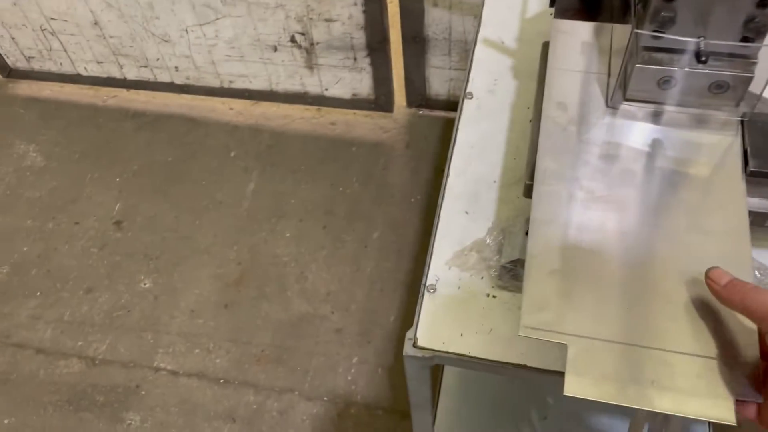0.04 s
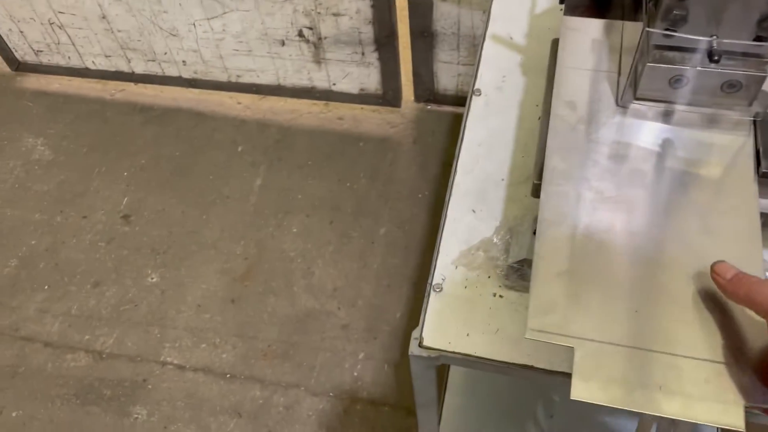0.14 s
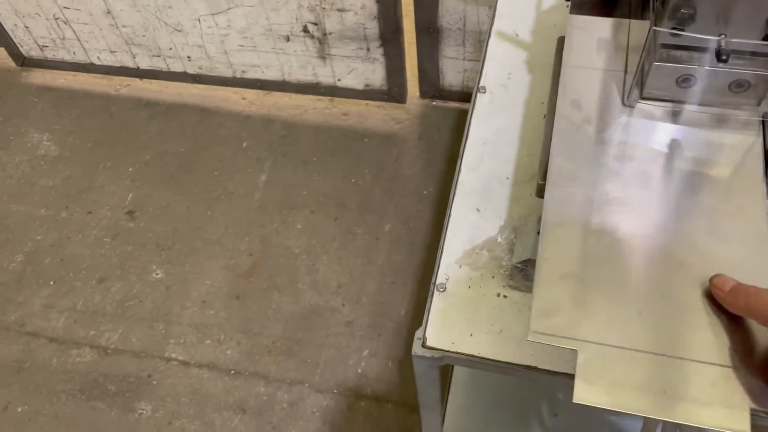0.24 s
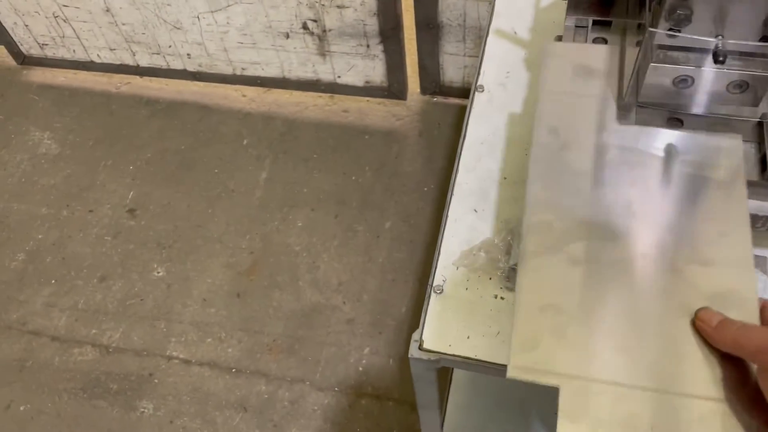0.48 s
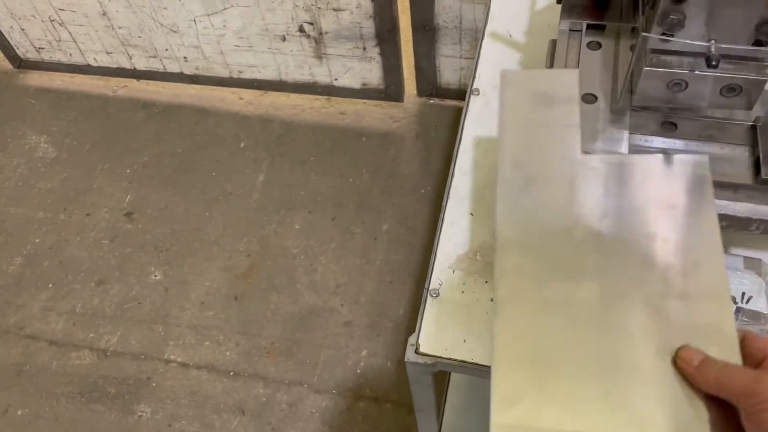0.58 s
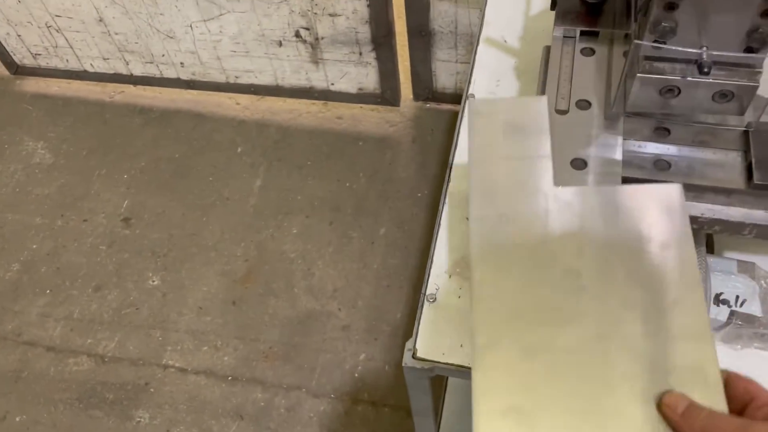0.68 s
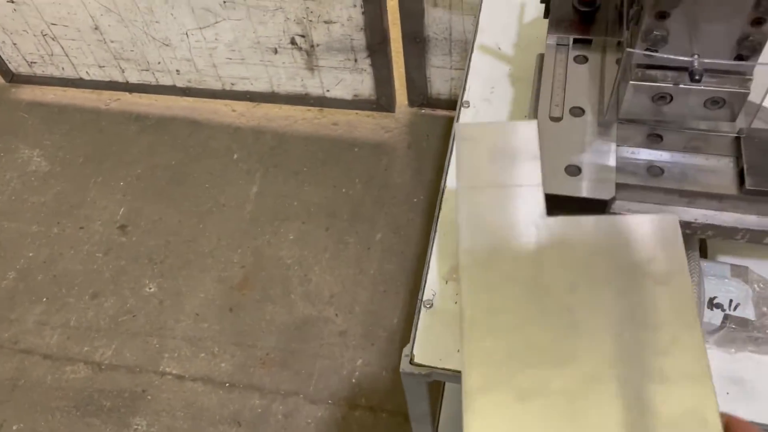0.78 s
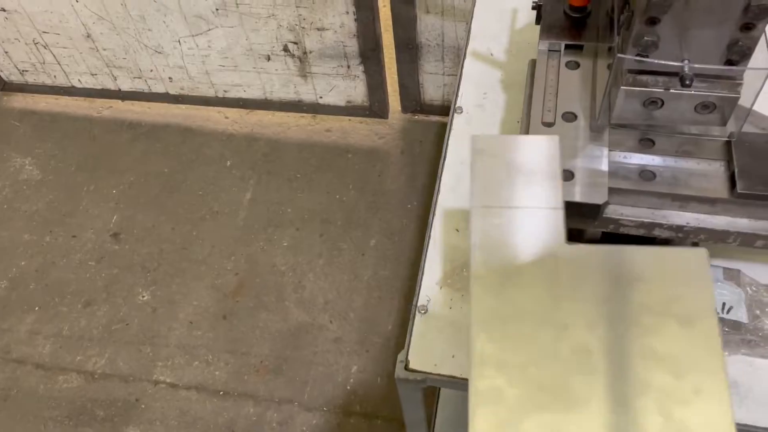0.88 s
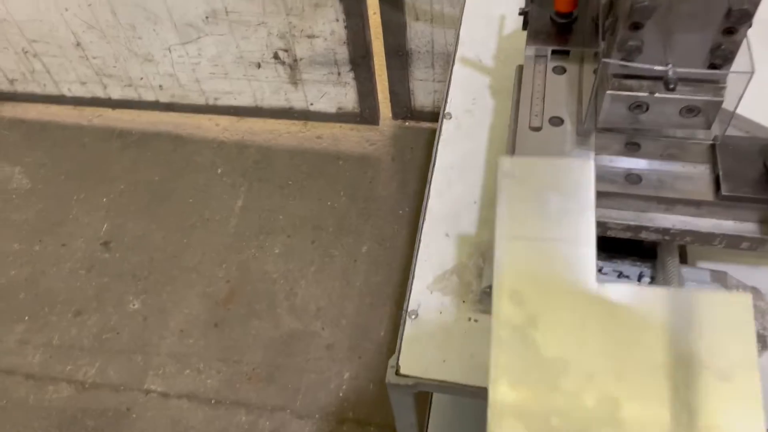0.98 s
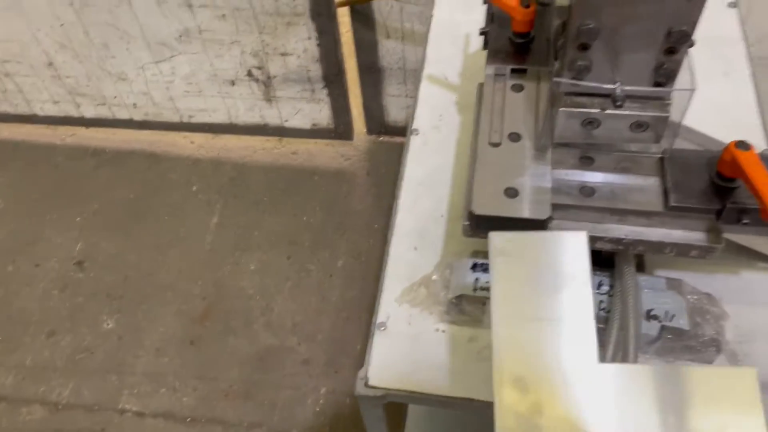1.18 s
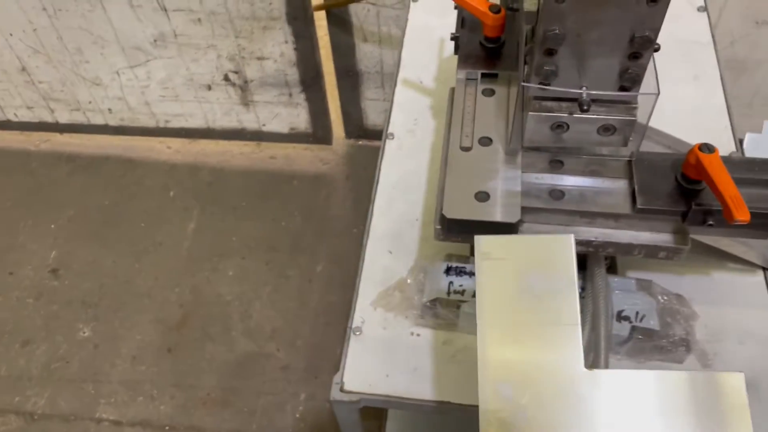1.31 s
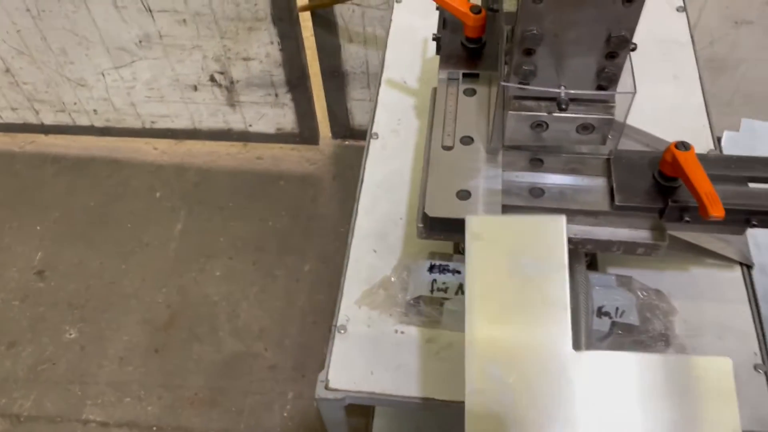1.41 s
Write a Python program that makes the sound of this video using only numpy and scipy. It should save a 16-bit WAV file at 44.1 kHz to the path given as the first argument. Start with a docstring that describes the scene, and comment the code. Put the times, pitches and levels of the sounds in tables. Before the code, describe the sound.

A steel sheet clacks on a metal table and scrapes briefly out of a machine.

```python
"""Workshop: a steel sheet is drawn out of a pneumatic notching machine.
It shifts, clacks on the steel table, scrapes over the die in short jerks, rings as its edge slips
free and glides off. Impacts and friction slips drive the sheet's clear and dense modes.
Housing and room echo it; behind it a motor hums and the workshop rumbles."""
import sys
import numpy as np
from scipy import signal
from scipy.fft import rfft, irfft
from scipy.io import wavfile

SR = 44100
rng = np.random.default_rng(int(sys.argv[2]) if len(sys.argv) > 2 else 0)


def wav_out(sig):
    """Save sig, one row per channel (or a flat mono array), as 16-bit PCM at SR to the path in sys.argv[1]."""
    wavfile.write(sys.argv[1], SR, np.round(np.clip(np.atleast_2d(sig).T, -1, 1) * 32767).astype(np.int16))


N = 63945
TIME = np.arange(N) / SR
BIN_HZ = np.arange(N + 1) * SR / (2 * N)

# dense modes of the scraped sheet: f/Hz, relative density/dB
SCRAPE_SPECTRUM = [(150, -5), (450, 3), (850, -2.5), (1100, -9.5), (1600, -3.5), (2400, 0), (3600, -3),
                   (5300, -3), (6900, 3.5), (9000, 6), (10300, -4), (12500, -7.5), (16000, -4)]
# their decay: f/Hz, t60/s
SCRAPE_DECAY = [(400, 0.17), (3000, 0.013), (10000, 0.02)]


def from_db(db):
    return 10 ** (np.asarray(db) / 20)


def unit_rms(x):
    return x / np.sqrt(np.mean(x ** 2) + 1e-20)


def unit_energy(x):
    return unit_rms(x) / np.sqrt(N)


def at_hz(points, hz):
    """Table lookup on a log-frequency axis."""
    points_hz, values = np.transpose(points)
    return np.interp(np.log(np.maximum(hz, 1)), np.log(points_hz), values)


def gain_curve(points):
    return from_db(np.interp(TIME, *np.transpose(points)))


def click(t_s):
    return 1.0 * (np.arange(N) == int(t_s * SR))


def soften(x, cutoff_hz):
    """A softer contact passes less treble."""
    return signal.sosfilt(signal.butter(1, cutoff_hz, fs=SR, output="sos"), x + 1e-18)


def through(x, response):
    return signal.fftconvolve(x, response)[:N]


def noise_bands(size=N):
    """Yields (centre/Hz, noise) per third octave; neighbours are uncorrelated."""
    edges_hz = 20 * 2 ** (np.arange(30) / 3)
    white = rng.standard_normal((2, size + SR // 8))
    for k, (low, high) in enumerate(zip(edges_hz, edges_hz[1:])):
        bandpass = signal.butter(2, [low, high], "band", fs=SR, output="sos")
        yield np.sqrt(low * high), signal.sosfilt(bandpass, white[k % 2])[-size:]


def dense_ring(spectrum, decay, size=N // 6):
    """Impulse response of countless modes, each band dying at its own rate."""
    out = 0
    for hz, band in noise_bands(size):
        tail = band * from_db(-60 * TIME[:size] / at_hz(decay, hz))
        out += unit_rms(tail) * np.sqrt(hz) * from_db(at_hz(spectrum, hz))
    return unit_energy(np.pad(out, (0, N - size)))


def modal_ring(modes):
    """Impulse response of a few clear modes, alternating in sign."""
    return sum((-1) ** k * from_db(db - 60 * TIME / t60_s) * np.sin(2 * np.pi * hz * TIME)
               for k, (hz, db, t60_s) in enumerate(modes))


def diffuse(mid, side):
    """Sound from all around: channels alike in the bass, less so above."""
    # diffuse field: f/Hz, left-right correlation
    likeness = [(60, 0.93), (300, 0.84), (1000, 0.2), (3000, 0.54), (10000, 0.15)]
    alike = np.clip(at_hz(likeness, BIN_HZ), -1, 1)
    mid = irfft(rfft(mid, 2 * N) * np.sqrt((1 + alike) / 2))[:N]
    side = irfft(rfft(side, 2 * N) * np.sqrt((1 - alike) / 2))[:N]
    return np.array([mid + side, mid - side])


def place(x):
    """Direct sound reaches the two microphone ports with unequal level and phase."""
    # balance: f/Hz, left minus right/dB
    balance = [(100, 0), (250, -1.5), (700, -1.7), (1300, -2), (2000, 4), (2700, 7), (3500, 5), (5000, 3),
               (8000, 0)]
    # phase: f/Hz, left lead/rad
    lead = [(100, 0), (1000, 0.66), (1900, 0), (3200, 0.5), (4900, 0.5), (6400, -1.5), (7700, -2),
            (8900, -2.5), (11000, -6.5), (12400, -8), (14000, -9.4)]
    left = from_db(at_hz(balance, BIN_HZ) / 2) * np.exp(.5j * at_hz(lead, BIN_HZ))
    return irfft(rfft(x, 2 * N) * np.array([left, 1 / left]))[:, :N]


def workshop():
    """Rumble with faint hiss, motor hum and soft, low bumps."""
    # rumble and hiss: f/Hz, relative density/dB
    spectrum = [(22, -42), (38, -13), (55, -2.5), (110, -3.5), (200, -6.5), (400, -14.5), (700, -21.5),
                (950, -19.5), (1500, -31), (2300, -29), (4000, -38.5), (7000, -39), (10500, -32),
                (13000, -41), (15000, -92)]
    # their envelope: t/s, level/dB
    levels = [(0, -62), (.3, -61), (.85, -62), (1.15, -60.5), (1.3, -59.5), (1.45, -59.5)]
    # motor tones: f/Hz, rms level/dB
    tones = [(55, -66), (110, -67), (221, -71.5)]
    # bumps: t/s, level/dB
    thuds = [(0.728, -47), (0.86, -45), (1.283, -42.5), (1.297, -48.5), (1.355, -49), (1.376, -44.5)]
    mid, side = (sum(band * from_db(at_hz(spectrum, hz)) for hz, band in noise_bands()) for _ in range(2))
    rumble = diffuse(unit_rms(mid), unit_rms(side)) * gain_curve(levels)
    hum = sum(np.sqrt(2) * from_db(db) * np.sin(2 * np.pi * (hz * TIME + rng.random()))
              for hz, db in tones)
    thud_hz, thud_t60_s = 62.4, .099
    blows = sum(from_db(db) * click(t_s) for t_s, db in thuds)
    return rumble + hum + through(blows, modal_ring([(thud_hz, 0, thud_t60_s)]))


def reflections(x):
    """Diffuse echoes: early off the machine housing, late off the room."""
    # echo colour: f/Hz, relative density/dB
    colour = [(100, -11), (500, -5.5), (1200, -6.5), (3500, -0.5), (7000, -4), (14000, -14)]
    # room and housing decay: f/Hz, t60/s
    room_decay = [(100, 1), (1000, 0.98), (3500, 0.91), (7000, 0.55), (14000, 0.8)]
    housing_decay = [(1000, .035), (10000, .021)]
    housing_db, room_db = -7.5, -17
    out = 0
    for db, decay in (housing_db, housing_decay), (room_db, room_decay):
        mid, side = (through(x, dense_ring(colour, decay, size=N)) for _ in range(2))
        out += from_db(db) * diffuse(mid, side)
    return out


def swish():
    """Light, even rubbing as the sheet glides off the table; a few broad modes colour it."""
    # rubbing envelope: t/s, level/dB
    levels = [(.55, -100), (.66, -74), (.85, -74.5), (.95, -78), (1.04, -74), (1.2, -73), (1.31, -77),
              (1.35, -80.5)]
    # dense modes: f/Hz, relative density/dB
    spectrum = [(300, -3), (1000, -15), (1450, -24), (2300, 6), (3600, -8), (5000, 0.5), (10500, -5.5),
                (14000, -4.5)]
    # gliding sheet: f/Hz, relative level/dB, t60/s
    modes = [(1830, 0, .04), (2130, -2, .025), (2410, 0, .03), (4300, 3, .012), (4900, 3, .012)]
    rubbing = rng.standard_normal(N) * gain_curve(levels)
    body = dense_ring(spectrum, SCRAPE_DECAY) + from_db(-1.5) * unit_energy(modal_ring(modes))
    return through(rubbing, body)


def burr_ticks():
    """Burrs snag on the die: short ticks, each with its own colour."""
    # snags: t/s, relative level/dB
    snags = [(0.3825, -8), (0.4014, -4), (0.418, 0), (0.4728, -1.5), (0.5014, 2), (.5393, -1.5),
             (0.5716, -0.5)]
    ticks = sum(from_db(db) * through(click(t_s), dense_ring(SCRAPE_SPECTRUM, SCRAPE_DECAY))
                for t_s, db in snags)
    return from_db(-22.5) * ticks


def edge_ring():
    """The leaving edge catches on the die; each spot favours other modes of the freed sheet."""
    # catches: t/s, relative level/dB, favoured f/Hz
    catches = [(.5375, 4, 4600), (.5400, -3, 3730), (.5535, 3.5, 3180), (.5600, 3.5, 3200),
               (.5698, -2, 3000), (.5755, 1.5, 2930)]
    # free sheet: f/Hz, relative level/dB, t60/s
    modes = [(2150, -1, .18), (2945, -8, .06), (3050, -11, .1), (3226, -2.5, .11), (3340, -7, .06),
             (3472, -1, .055), (3570, -5, .04), (4397, -2, .05), (4735, -4, .07)]
    gain_db, half_width_oct = -46.5, .37
    out = 0
    for t_s, catch_db, spot_hz in catches:
        stirred = [(hz, db - 6 * (np.log2(hz / spot_hz) / half_width_oct) ** 2, t60_s)
                   for hz, db, t60_s in modes]
        out += from_db(gain_db + catch_db) * through(click(t_s), modal_ring(stirred))
    return out


def friction(strokes):
    """Bursts of tiny, uneven slips; each burst starts with a snap and lets go quickly."""
    slips_per_s, spread_db, snap_db = 2600, 4.5, 13.5
    attack_s, release_s = .0023, .0097
    out = 0
    for start_s, length_s, db, cutoff_hz in strokes:
        sizes = from_db(spread_db * np.minimum(rng.exponential(1, N), 4)) * rng.choice([-1, 1], N)
        slips = unit_rms(sizes * (rng.random(N) < slips_per_s / SR))
        attack = np.clip((TIME - start_s) / attack_s, 0, 1)
        release = np.exp(-np.maximum(TIME - start_s - length_s, 0) / release_s)
        snap = from_db(snap_db) * click(start_s + attack_s)
        out += from_db(db) * soften(slips * attack * release + snap, cutoff_hz)
    return out


def scrape():
    """Nudges strike the held sheet; then it jerks over the die, its colour shifting with the contact."""
    # coming unstuck: t/s, length/s, relative level/dB, cutoff/Hz
    nudges = [(.2094, .009, -7, 2500), (.2189, .006, -1, 4900), (.2244, .007, 1, 4900)]
    # sliding jerks: t/s, length/s, relative level/dB, cutoff/Hz
    jerks = [(.345, 0.046, -4, 5600), (.374, 0.032, 3.5, 7450), (.416, 0.0033, 8.5, 11100),
             (.431, 0.01, 5, 3800), (.4645, 0.016, 4.5, 15000), (.4955, 0.014, 5, 14900),
             (.512, 0.033, 5.5, 10400), (.545, 0.017, -0.5, 11100)]
    # held sheet: f/Hz, relative level/dB, t60/s
    held_modes = [(612, -2, .15), (915, -11, .14), (1236, 0, .09), (1390, -4, .06), (1502, -5, .06),
                  (1790, -7, .06), (1928, -1, .11), (2202, -7, .06), (2681, -6, .08), (2925, -7, .07),
                  (3225, -4, .045), (3930, 0, .04), (4260, -7, .045), (4950, -3, .03), (5250, -6, .03)]
    # sliding sheet: f/Hz, relative level/dB, t60/s
    sliding_modes = [(364, -8, 0.05), (717, -10.5, 0.084), (1207, -12.5, 0.13), (2231, -1, 0.034),
                     (2660, -6, 0.03), (3295, -7, 0.091), (3600, -7, 0.042), (3880, -8, 0.045),
                     (6400, -1, 0.036), (7030, 6.5, 0.029)]
    bodies = [dense_ring(SCRAPE_SPECTRUM, SCRAPE_DECAY) for _ in range(4)]
    taps = sum(from_db(db) * soften(click(t_s), cutoff_hz) for t_s, _, db, cutoff_hz in nudges)
    held_ring = from_db(-46.5) * through(taps, modal_ring(held_modes))
    held_hiss = from_db(-43.5) * through(soften(friction(nudges), cutoff_hz=3500), bodies[0])
    rasp = sum(through(friction(jerks[k::len(bodies)]), body) for k, body in enumerate(bodies))
    sliding_ring = through(friction(jerks), unit_energy(modal_ring(sliding_modes)))
    return held_ring + held_hiss + from_db(-49.5) * rasp + from_db(-56) * sliding_ring


def clack():
    """The sheet hits the table in a quick run of contacts; the dense modes vary with the spot."""
    # contacts: t/s, relative level/dB, cutoff/Hz
    knocks = [(.2722, -18.5, 4000), (.2900, -5, 1000), (.2956, -5, 800), (.3088, -2, 15000),
              (.3103, 0, 11000), (.3125, -1.5, 5050), (.3153, -1, 7500), (.3170, -1, 7500),
              (.3193, -4, 4600), (.335, -6, 1000), (.362, -13, 900)]
    # sheet on the table: f/Hz, relative level/dB, t60/s
    modes = [(301, -11, .14), (412, 1.5, .17), (578, -8, .22), (620, -12, .15), (739, -7, .25),
             (782, -9, .18), (1246, 3, .12), (1407, 2, .1), (1809, -7, .08), (2469, -3, .08),
             (2658, -5.5, .1), (4741, -4, .08), (5380, -8, .04), (6220, -7, .05)]
    # dense modes: f/Hz, relative density/dB
    spectrum = [(60, -7), (150, 3), (350, -1.5), (700, 2), (1000, -7.5), (1400, 4.5), (2600, 0), (5000, -8),
                (7000, -2), (9500, 7.5), (11500, -7.5), (15000, -10)]
    # their decay: f/Hz, t60/s
    decay = [(100, 0.23), (500, 0.17), (1500, 0.057), (4000, 0.046), (10000, 0.012)]
    dense = [from_db(-6.5) * dense_ring(spectrum, decay) for _ in range(4)]
    clear = from_db(-41) * modal_ring(modes)
    out = 0
    for k, (t_s, db, cutoff_hz) in enumerate(knocks):
        blow = from_db(db) * soften(click(t_s), cutoff_hz)
        out += through(blow, clear + dense[k % len(dense)])
    return out


def scene():
    """The sheet close by, its echoes and the workshop, in stereo."""
    contact = clack() + scrape() + burr_ticks()
    edge = edge_ring()
    edge_pan_db = [[2], [-2]]  # left, right
    direct = place(contact) + place(edge) * from_db(edge_pan_db)
    return direct + reflections(contact + edge) + diffuse(swish(), swish()) + workshop()


def record(dry):
    """Tone shaping: deep treble notch, roll-off above it, highest treble removed."""
    notch_hz, width_hz, rolloff_hz, cutoff_hz = 8260, 1620, 12520, 16400
    notch = signal.iirnotch(notch_hz, notch_hz / width_hz, fs=SR)
    dipped = signal.lfilter(*notch, signal.lfilter(*notch, dry))
    rolled = signal.sosfilt(signal.butter(4, rolloff_hz, fs=SR, output="sos"), dipped)
    return signal.sosfilt(signal.ellip(10, .2, 70, cutoff_hz, fs=SR, output="sos"), rolled)


dry = scene()
out = record(dry)
wav_out(out)
```